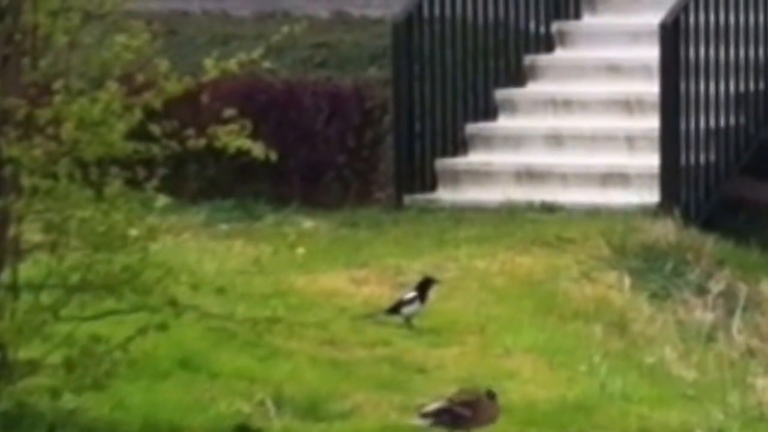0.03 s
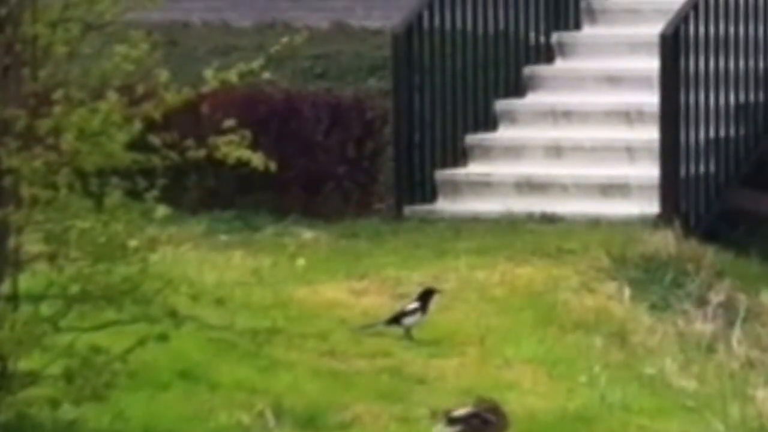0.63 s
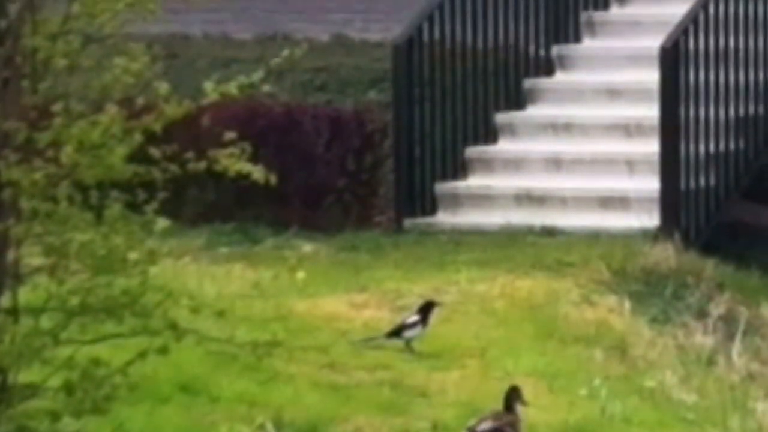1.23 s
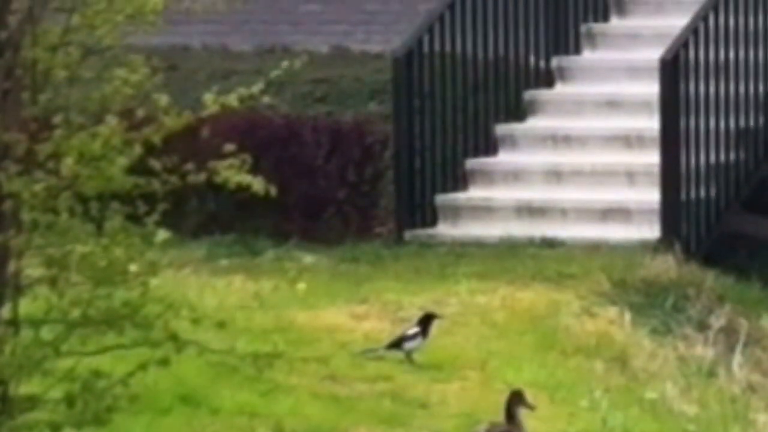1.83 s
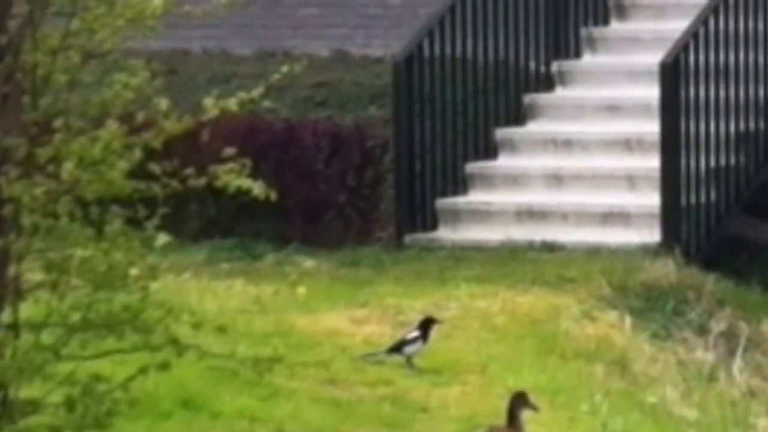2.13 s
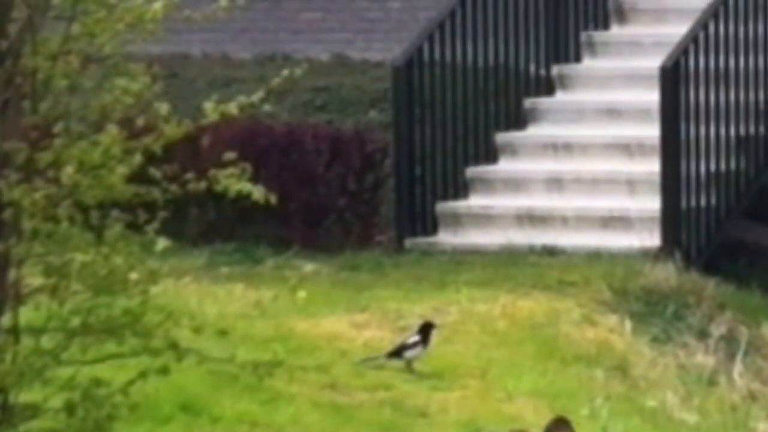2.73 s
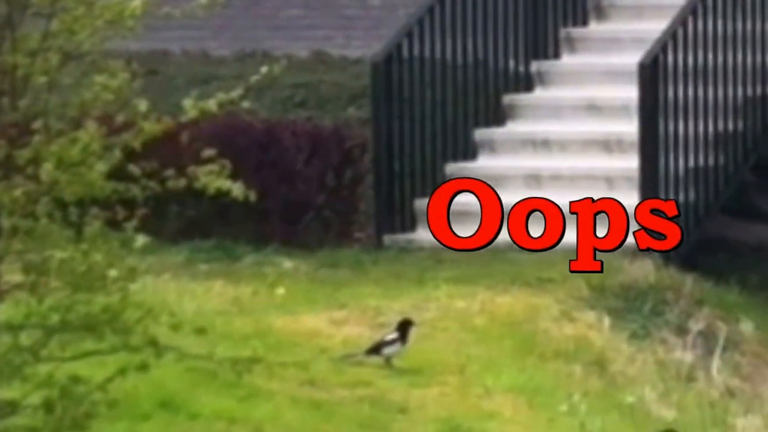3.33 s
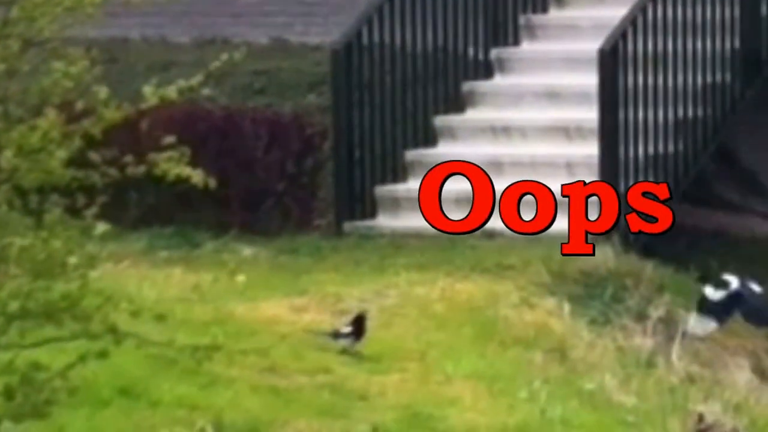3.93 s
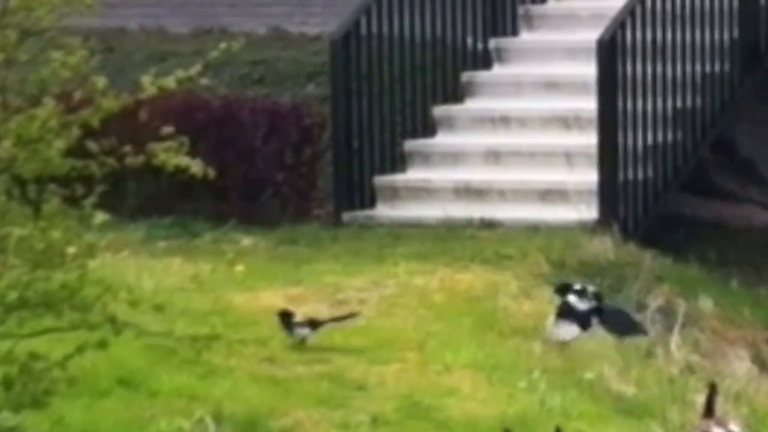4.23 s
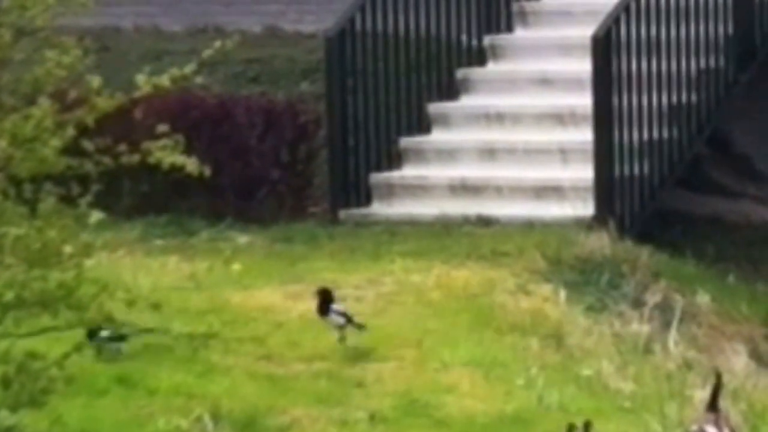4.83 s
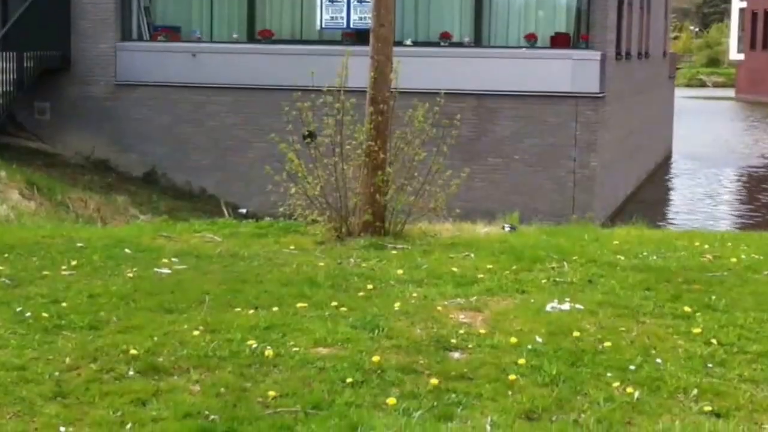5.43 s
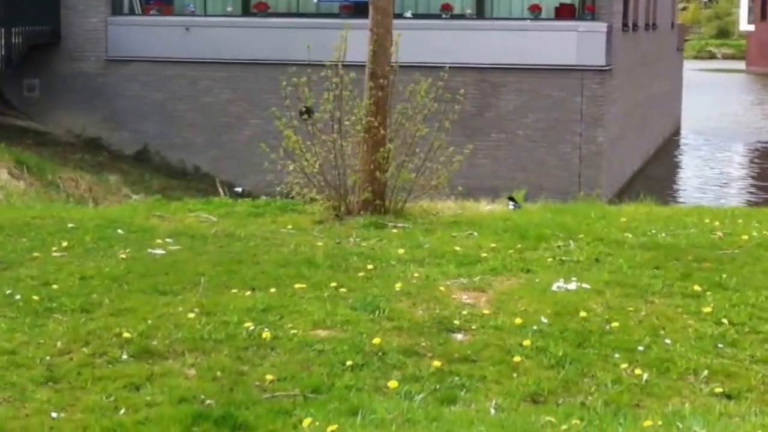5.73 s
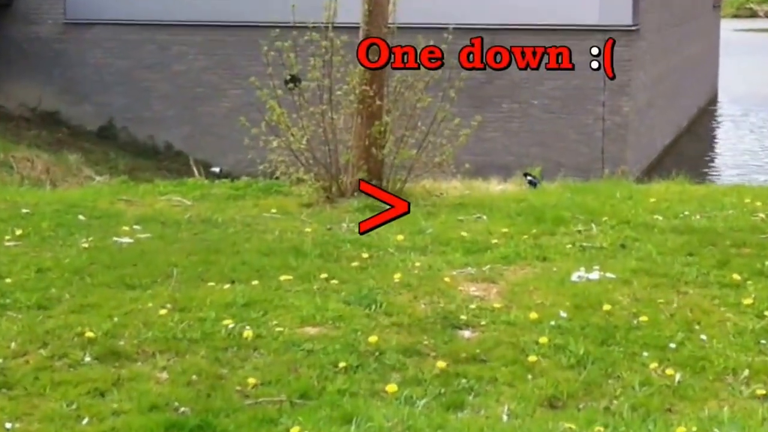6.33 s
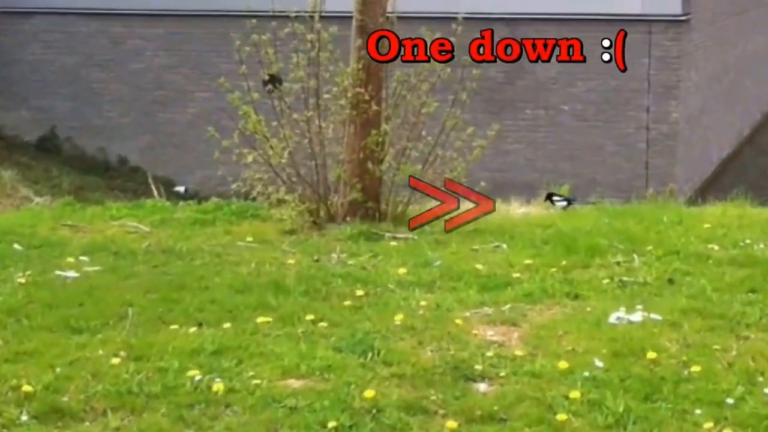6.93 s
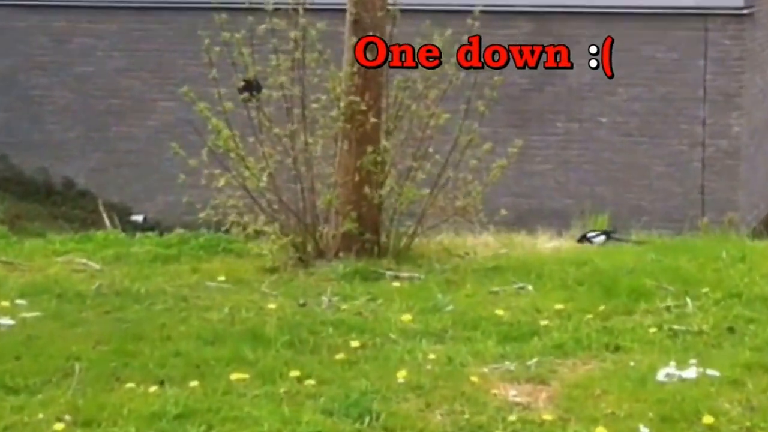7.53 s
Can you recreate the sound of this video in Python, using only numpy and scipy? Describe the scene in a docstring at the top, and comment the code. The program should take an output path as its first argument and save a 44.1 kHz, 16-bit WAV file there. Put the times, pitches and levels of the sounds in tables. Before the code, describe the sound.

On an open lawn, a low, gusty wind rumble on the microphone dominates, with a steady road murmur far behind. Some way off, magpies give sparse high chirps, break into a brief rasping, squealing quarrel, and trail off. After a tiny dropout just past five seconds, the wind carries on and a nearer car's soft tyre hiss swells.

```python
"""Wind buffets the microphone in gusts and single thumps over the murmur of distant traffic.
Magpies call faintly across a lawn, then squabble at about 3 s: the syrinx whistles thin squeals,
and its chaotic pulses ring the throat in three harsh rasps. The quarrel peters out in short pips.
Just after 5 s the sound drops out for a moment; it resumes a little brighter with the tyre hiss
of a nearer car, which swells towards the end."""
import sys
import numpy as np
from scipy import signal
from scipy.fft import rfft, irfft, next_fast_len
from scipy.io import wavfile
from scipy.ndimage import map_coordinates

SR = 44100
rng = np.random.default_rng(int(sys.argv[2]) if len(sys.argv) > 2 else 0)


def unload_wav(signal):
    """Save mono or channel-first audio to the path in sys.argv[1] as 16-bit WAV at rate SR, clipped to [-1, 1]."""
    wavfile.write(
        sys.argv[1],
        SR,
        np.round(np.clip(np.atleast_2d(signal).T, -1, 1) * 32767).astype(np.int16),
    )


N = 339129
TIME = np.arange(N) / SR


def syrinx_note(hz, rough, octave_db=-14, beat_hz=620, bill_hz=4300, upper_bill_hz=7950):
    """Amplitude modulation: the two sides of the syrinx beat, adding sidebands to a wavering whistle."""
    size = len(hz)
    waver = .035 * walk(110, size) + .04 * walk(1000, size)
    phase = 2 * np.pi * np.cumsum(hz * (1 + rough * waver)) / SR
    beat_rate = beat_hz * (1 + .235 * walk(323, size))
    beat = np.cos(2 * np.pi * np.cumsum(beat_rate) / SR)
    modulated = np.sin(phase) * (1 + 1.3 * rough * beat)
    whistle = unit(resonance(modulated, bill_hz, width=1000))  # the bill favours the nearest sideband
    noise_skirt = walk(1100, size) * np.sin(phase) + walk(1100, size) * np.cos(phase)
    overtone = undb(octave_db) * unit(np.sin(2 * phase))
    octave = resonance(overtone, upper_bill_hz, width=770)
    pressure = swell(np.arange(size) / size, edge=.12) * undb(3.2 * walk(130, size))
    return unit((whistle + rough * noise_skirt + octave) * pressure)


def arched_pitch(length, hz, arch=.012, drop=.054):
    """Pitch follows breath pressure: a slight arch, then a late drop as the bird runs out of air."""
    u = progress(length)
    return hz * (1 + arch * (.5 - (2 * u - 1) ** 2) - drop * u ** 5)


# Each row: start in seconds, length in seconds, pitch in Hz, level in dB, roughness from 0 to 1.
SQUEAL_NOTES = [ (1.750, 0.12, 3630, -80, .3), (2.423, .12, 4350, -79, 0.26),
                (2.787, 0.15, 3710, -72.5, 0.86), (3.024, 0.042, 4580, -63.5, 0.46),
                (3.07, 0.0256, 5270, -57.5, 0.25), (3.111, .085, 4070, -62.5, .35),
                (3.215, 0.18, 4430, -64.5, 0.33), (3.329, .1, 3800, -66, 0.34),
                (3.476, 0.061, 4450, -72, 0.6), (3.515, .105, 4540, -66.5, .28),
                (3.574, 0.087, 3960, -68, .33), (3.74, .13, 4050, -69.5, 0.77),
                (3.787, 0.095, 4720, -67, .22), (3.858, 0.13, 2840, -77, .3),
                (3.945, 0.066, 3850, -76, .45), (4.034, .035, 4240, -67, 0.2),
                (4.058, 0.071, 3960, -69, 0.28), (4.095, 0.068, 4600, -68, 0.16),
                (4.282, 0.11, 3840, -68.5, .28), (4.308, .08, 4600, -77, 0.3)]


def squeals():
    """Sustained oscillation of the syrinx: held notes, high and low overlapping as the quarrel peaks."""
    out = np.zeros(N)
    for start, length, hz, db, rough in SQUEAL_NOTES:
        add(out, start, undb(db) * syrinx_note(arched_pitch(length, hz), rough))
    return out


# Throat and bill resonances. Each row: centre in Hz, nominal width in Hz, relative gain in dB.
FORMANTS = [(1880, 410, 0), (2250, 310, 3), (4050, 450, -24), (4900, 1190, 2.5), (7270, 1040, -7),
            (9800, 1200, -25)]
# Each row: start in seconds, length in seconds, level in dB, treble tilt in dB per two octaves.
RASP_CALLS = [(3.016, 0.021, -63, 6), (3.09, 0.047, -54.5, -2), (3.144, 0.049, -58, -15)]


def rasps(pulse_hz=620, scatter=.2, breathiness=.93, fade=.88):
    """Source and filter: chaotic pulses of the syrinx ring the throat; air absorption dulls the top."""
    out = np.zeros(N)
    for start, length, db, tilt in RASP_CALLS:
        u = progress(length)
        cycles = np.cumsum(pulse_hz * np.exp(scatter * walk(700, len(u)))) / SR
        pulses = unit(np.diff(np.floor(cycles), prepend=0))
        breath = breathiness * rng.standard_normal(N)[:len(u)]
        drive = (pulses + breath) * swell(u, edge=.13) * np.exp(-fade * u)
        drive = np.pad(drive, (0, 512))  # room to ring out
        cry = np.zeros(len(drive))
        for hz, width, gain_db in FORMANTS:
            tilt_db = tilt * np.log2(hz / FORMANTS[0][0]) / 2
            ringing = resonance(resonance(drive, hz, 2 * width), hz, 2 * width)
            cry += undb(gain_db + tilt_db) * ringing
        add(out, start, undb(db) * unit(cry))
    return signal.sosfilt(signal.butter(3, 10500, fs=SR, output="sos"), out)


# Each row: start in seconds, length in seconds, target pitch in Hz, level in dB,
# initial excess as a share of that pitch.
SLUR_NOTES = [ (0.494, .06, 4510, -75.5, 0.25), (1.145, .075, 3950, -82, .14), (1.440, .02, 5350, -77, .2),
              (2.060, 0.12, 4850, -81, .05), (2.292, 0.085, 4260, -79, .1),
              (2.934, 0.094, 4230, -60.5, .15), (2.949, 0.082, 5340, -72, .13), (2.960, 0.2, 2540, -71, .1)]


def slurs(settle_share=.3):
    """Exponential glide: each note starts high and slides down towards its pitch."""
    out = np.zeros(N)
    for start, length, hz, db, excess in SLUR_NOTES:
        slide = 1 + excess * np.exp(-progress(length) / settle_share)
        add(out, start, undb(db) * syrinx_note(hz * slide, rough=.26, octave_db=-4.5))
    return out


# Each row: start in seconds, pitch in Hz, level in dB.
PIP_NOTES = [(.045, 4730, -81), (.105, 4750, -80), (.59, 4670, -78), (1.055, 3900, -81), (4.215, 3710, -76),
             (4.405, 4400, -74.5), (4.465, 4380, -75), (4.505, 3840, -76), (4.552, 3840, -71),
             (4.612, 4320, -77), (4.774, 3780, -73.5), (4.833, 3800, -76), (5.175, 3760, -77)]


def pips(length_s=.0307):
    """Tone bursts of the syrinx: very short squeals, most of them as the quarrel peters out."""
    out = np.zeros(N)
    for start, hz, db in PIP_NOTES:
        add(out, start, undb(db) * syrinx_note(arched_pitch(length_s, hz), rough=.3))
    return out


def yard(calls, echo_s=.04, echo_db=-13, t60_s=.55, tail_db=-8):
    """Reflection and scattering: a wall returns one echo; steps and shrubs add a short tail."""
    decay = np.exp(-np.log(1000) * TIME[:SR] / t60_s)
    response = undb(tail_db) * unit(rng.standard_normal(SR) * decay) / np.sqrt(SR)
    response[0] += 1
    response[int(echo_s * SR)] += undb(echo_db)
    return calls + signal.fftconvolve(calls, response)[:N]


# The breeze between gusts. Each row: time in seconds, relative level in dB.
BREEZE_LEVELS = [(0, -45), (.85, -48), (1.35, -38.5), (1.7, -47.5), (2.05, -41), (2.35, -34.5),
                 (2.6, -40.5), (3.05, -36.5), (3.17, -47), (3.75, -51.5), (4.1, -48.5), (5.25, -57.5),
                 (5.9, -47), (6.35, -39), (6.65, -50), (7.69, -49)]
# Each row: time of the peak in seconds, length in seconds, relative level in dB.
GUST_PEAKS = [ (.08, 0.075, -36.5), (0.372, 0.049, -39.5), (0.548, 0.082, -34.5), (0.98, 0.065, -36.5),
              (1.095, 0.025, -35), (1.31, 0.17, -35), (1.747, 0.044, -38), (1.904, 0.031, -33.5),
              (2.205, 0.16, -32), (2.453, 0.036, -30.5), (3.043, 0.082, -29.5), (3.473, 0.096, -46.5),
              (3.922, 0.027, -40.5), (4.443, 0.03, -45), (5.415, 0.16, -36.5), (5.622, 0.05, -37.5),
              (5.758, 0.071, -38), (6.038, 0.11, -32.5), (6.821, .08, -41.5), (7.074, 0.062, -41),
              (7.213, 0.047, -40), (7.336, 0.036, -39), (7.572, 0.082, -35.5), (7.678, .05, -35)]


def wind_strength(rise_share=.5, fall_share=.53):
    """Incoherent powers add: each gust swells and dies on top of the breeze. The sum is in dB."""
    power = undb(curve(BREEZE_LEVELS)) ** 2
    for peak, length, db in GUST_PEAKS:
        ramp = length * np.where(TIME < peak, rise_share, fall_share)
        power += undb(db) ** 2 * np.exp(-((TIME - peak) / ramp) ** 2)
    return 10 * np.log10(power)


# Each row: frequency in Hz, relative spectral density in dB.
RUMBLE_SPECTRUM = [(25, -62), (45, -29.5), (70, -14.5), (100, -2.5), (130, 0.5), (170, 2.5), (220, -4),
                   (300, -15.5), (420, -36), (800, -70), (3000, -90)]


def wind(trim_db=.3, fine_db=-18, fine_growth=.76):
    """Turbulence rumbles on the microphone; stronger gusts shed finer, higher-pitched eddies."""
    strength_db = wind_strength()
    gust_db = strength_db + 1.8 * walk(70)
    fine_eddies = noise([(150, -31), (260, 2.5), (350, 3.5), (480, -2), (800, -39), (3000, -85)])
    fine_share = undb(fine_db + fine_growth * (gust_db - np.max(strength_db)))
    return undb(gust_db + trim_db) * (noise(RUMBLE_SPECTRUM) + fine_share * fine_eddies)


# Each row: time of arrival in seconds, envelope level in dB, centre frequency in Hz.
EDDIES = [(.071, -21.5, 352), (1.264, -21.5, 245), (2.233, -19, 158), (2.358, -17, 193),
          (2.444, -17.5, 185), (2.885, -14, 193), (2.997, -12, 209), (5.678, -21.5, 212), (6.168, -22, 300),
          (6.306, -20, 195), (6.399, -20.5, 153), (6.442, -28.5, 284), (7.062, -22.5, 184),
          (7.302, -25.5, 207), (7.543, -23, 170)]


def thumps(rise=.57, fall=1.52, lead_s=.03, low_cut_hz=85):
    """Pressure transients: each eddy swings for a cycle or two, slowing as it dies."""
    out = np.zeros(N)
    t = TIME[:int(2 * lead_s * SR)] - lead_s
    for arrival, db, hz in EDDIES:
        ramp = .42 / hz * np.where(t < 0, rise, fall)
        envelope = 1 / np.cosh(t / ramp) ** 1.64
        swing = np.sin(2 * np.pi * hz * t * (1 - 12 * t))
        add(out, arrival - lead_s, undb(db) * envelope * swing)
    # the microphone sheds the deepest bass
    return signal.sosfilt(signal.butter(3, low_cut_hz, "high", fs=SR, output="sos"), out)


# Loudness of the road, its drone and the tyres. Each row: time in seconds, level in dB.
ROAD_LEVELS = [(0, -52.5), (.8, -54), (1.3, -52), (2, -55), (2.8, -54.5), (4.3, -53.5), (6.3, -50.5),
               (7.69, -51.5)]
DRONE_LEVELS = [(0, -64), (3.2, -62.5), (3.5, -58.5), (3.9, -59.5), (4.3, -63.5), (7.69, -76)]
TYRE_LEVELS = [(0, -67), (3, -74), (5.25, -64), (5.31, -56), (5.8, -60), (6.35, -56.5), (6.8, -59.5),
               (7.15, -55.5), (7.45, -50.5), (7.69, -47)]
# Their spectra. Each row: frequency in Hz, relative spectral density in dB.
ROAD_SPECTRUM = [(40, -15), (100, 1), (250, 9), (400, -4.5), (600, -1.5), (780, -1.5), (1020, 1.5),
                 (1350, -3.5), (1800, -5.5), (2400, -12.5), (3200, -17), (5000, -24), (9000, -47)]
DRONE_SPECTRUM = [(300, -12), (480, -6.5), (560, -4.5), (690, -7.5), (790, -10.5), (1100, -38)]
TYRE_SPECTRUM = [(200, -4.5), (450, 8.5), (900, 3), (1300, 3), (1750, 6.5), (2600, -1), (4000, -12),
                 (6500, -19.5), (12000, -28.5)]


def traffic(waver_db=.52):
    """Superposed noise: a far road, a hollow drone that swells once, an approaching car's tyres."""
    road = noise(ROAD_SPECTRUM) * undb(curve(ROAD_LEVELS) + waver_db * walk(8.3))
    drone = noise(DRONE_SPECTRUM) * undb(curve(DRONE_LEVELS))
    tyres = noise(TYRE_SPECTRUM) * undb(curve(TYRE_LEVELS) + waver_db * walk(20))
    return road + drone + tyres


# Each row: start in seconds, length in seconds, level in dB.
TREBLE_SWELLS = [(1.323, 0.65, -69.5), (5.21, .55, -66), (5.99, .36, -69.5)]
# Spectra of the swells and the microphone. Each row: frequency in Hz, relative spectral density in dB.
TREBLE_SPECTRUM = [(1500, -4), (3500, -2), (5300, 5.5), (7000, -1), (10500, 0.5), (12500, -8), (14500, -2),
                   (16000, -7)]
MIC_SPECTRUM = [(100, -12), (3000, 0.5), (6000, 4.5), (8700, 4), (10500, 1.5), (13000, 0.5), (15500, 2)]


def hiss(mic_db=-68.5, flicker_db=1):
    """Self-noise of the microphone: a steady floor, with a few soft swells of airy treble on top."""
    swells = sum(undb(db) * swell((TIME - start) / length, edge=.34)
                 for start, length, db in TREBLE_SWELLS)
    floor = undb(mic_db) * noise(MIC_SPECTRUM)
    return floor + swells * noise(TREBLE_SPECTRUM) * undb(flicker_db * walk(60))


def undb(db):
    """Decibels to amplitude gain."""
    return 10 ** (np.asarray(db) / 20)


def unit(x):
    """Normalisation to rms 1."""
    return x / np.sqrt(np.mean(x ** 2))


def curve(rows):
    """Linear interpolation of (seconds, value) points."""
    return np.interp(TIME, *np.transpose(rows))


def noise(spectrum):
    """Spectral shaping: white noise weighted by (Hz, dB) points, at rms 1."""
    hz, db = np.transpose(spectrum)
    size = next_fast_len(N)
    bins = np.maximum(np.fft.rfftfreq(size, 1 / SR), 1)
    gain = undb(np.interp(np.log(bins), np.log(hz), db))
    return unit(irfft(rfft(rng.standard_normal(size)) * gain, size)[:N])


def walk(rate_hz, size=N):
    """Smooth random fluctuation with a spread near 1."""
    place = np.arange(size) * rate_hz / SR
    return map_coordinates(rng.standard_normal(1024), [place], order=2, mode="wrap")


def resonance(x, hz, width):
    """A second-order resonator with gain 1 at its centre and a width in Hz."""
    return signal.lfilter(*signal.iirpeak(min(hz, .45 * SR), hz / width, fs=SR), x)


def add(track, start_s, sound):
    """Superposition of a sound onto a track."""
    start = max(int(start_s * SR), 0)
    track[start:start + len(sound)] += sound[:N - start]


def swell(u, edge):
    """A raised-cosine envelope for u from 0 to 1; each ramp takes the share edge."""
    return np.sin(np.pi / 2 * np.clip(np.minimum(u, 1 - u) / edge, 0, 1)) ** 2


def progress(length_s):
    """Normalised time, from 0 to 1 over a note."""
    size = int(length_s * SR)
    return np.arange(size) / size


def scene():
    """Superposition in mono: magpies in the yard, wind and the background."""
    outdoors = wind() + thumps() + traffic() + hiss()
    magpies = rasps() + squeals() + slurs() + pips()
    return (yard(magpies) + outdoors)[None]


def record(dry, gap_s=(5.258, 5.305), top_hz=15800):
    """Gating and band limiting: the sound drops out briefly, and a steep low-pass removes the top."""
    sounding = (TIME < gap_s[0]) | (TIME > gap_s[1])
    return signal.sosfilt(signal.ellip(10, .1, 70, top_hz, fs=SR, output="sos"), dry * sounding)


dry = scene()
out = record(dry)
unload_wav(out)
```